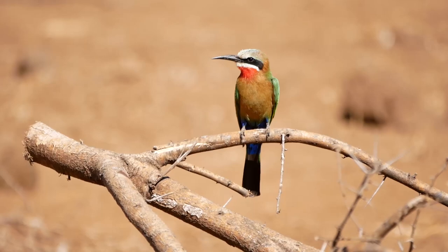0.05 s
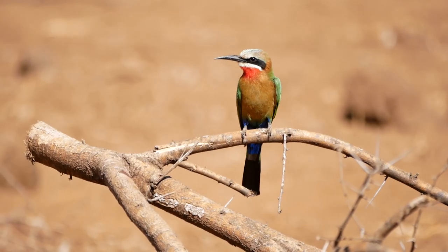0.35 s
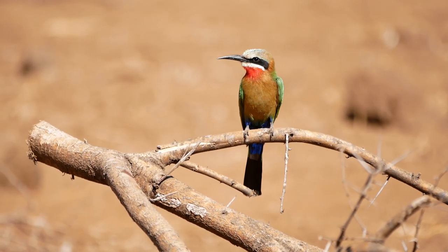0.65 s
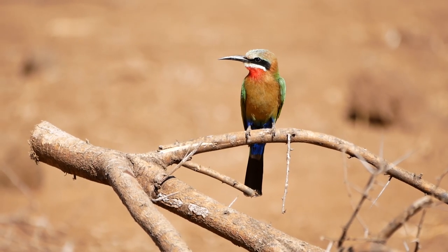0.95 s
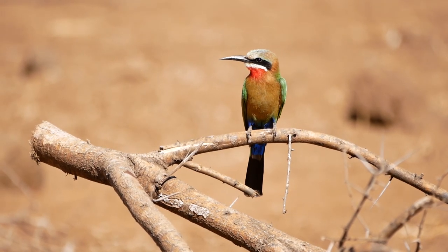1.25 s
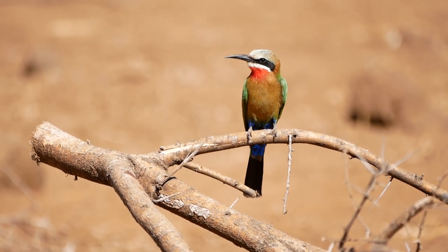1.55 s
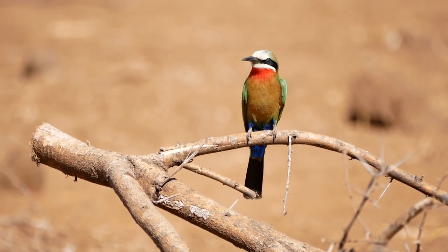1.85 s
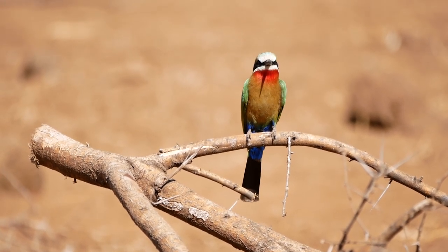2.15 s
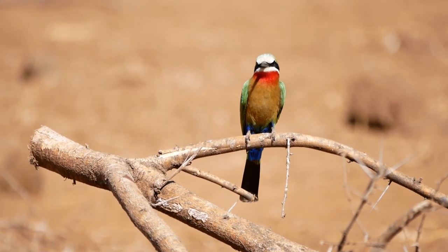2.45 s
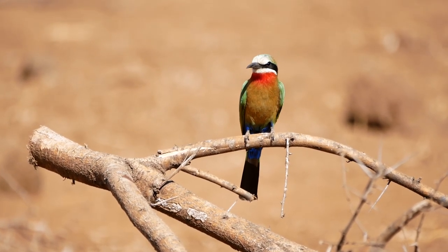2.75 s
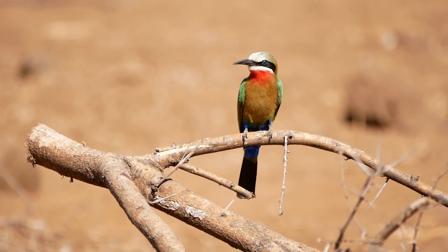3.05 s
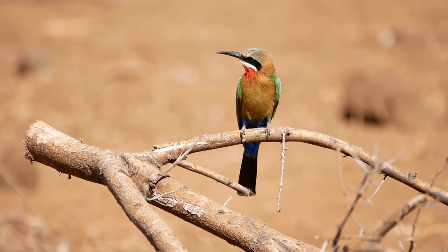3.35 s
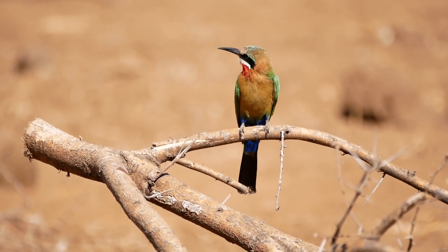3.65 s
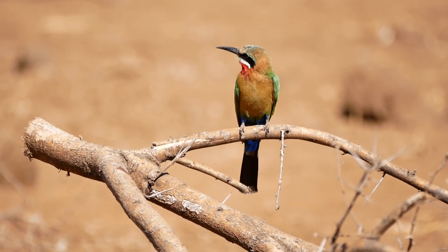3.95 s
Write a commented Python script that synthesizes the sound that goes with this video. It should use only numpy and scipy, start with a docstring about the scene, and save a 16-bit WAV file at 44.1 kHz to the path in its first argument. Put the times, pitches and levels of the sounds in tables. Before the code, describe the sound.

Small birds chirp faintly in open bush, their calls overlapping irregularly. Nearer ones give quick slurred chips while farther ones whistle and rasp with a slight echo. A steady airy hiss lies behind, and the microphone picks up almost no bass.

```python
"""Small birds in open bush

Nearer birds give quick slurred chips, farther ones whistle and rasp, and one adds thin high notes.
Every call scatters off branches on its way to the microphone and trails off in the trees.
Behind them lie a faint distant chorus and a steady airy hiss with narrow ringing bands.
The microphone passes almost no bass."""
import sys
import numpy as np
from scipy import signal
from scipy.fft import rfft, irfft, next_fast_len
from scipy.io import wavfile
from scipy.ndimage import map_coordinates

SR = 44100
rng = np.random.default_rng(int(sys.argv[2]) if len(sys.argv) > 2 else 0)


def unload_wav(signal):
    """Save mono or channel-first audio to the path in sys.argv[1] as 16-bit WAV at rate SR, clipped to [-1, 1]."""
    wavfile.write(
        sys.argv[1],
        SR,
        np.round(np.clip(np.atleast_2d(signal).T, -1, 1) * 32767).astype(np.int16),
    )


N = 176400


def amp(db):
    return 10 ** (np.asarray(db) / 20)


def unit_rms(x):
    return x / np.sqrt(np.mean(x ** 2) + 1e-20)


def gain_curve(points, hz):
    """Gain at hz, read between (Hz, dB) points on a log frequency axis."""
    point_hz, point_db = np.transpose(points)
    return amp(np.interp(np.log(hz + 1), np.log(point_hz + 1), point_db))


def filtered(x, response):
    """Shape the spectrum of x by response(hz)."""
    size = next_fast_len(N + SR // 2)
    return irfft(rfft(x, size) * response(np.fft.rfftfreq(size, 1 / SR)), size)[..., :N]


def wobble(per_s, size):
    """A smooth random curve with per_s knots a second."""
    return map_coordinates(rng.standard_normal(1024), [np.arange(size) * per_s / SR], mode="mirror")


def add(out, start_s, x):
    """Mix stereo x into out from start_s on."""
    i = int(np.clip(round(start_s * SR), 0, N - 1))
    out[:, i:i + x.shape[1]] += x[:, :N - i]


def note(length_s, pitches, crest, taper, flutter_hz, flutter_per_s, tremor_db=2.4, tremor_per_s=260):
    """One bird note: a sine slurred through the pitches, swelling unevenly to its crest and fading."""
    progress = np.linspace(0, 1, max(int(length_s * SR), 64))
    slur = np.polyfit(np.linspace(0, 1, len(pitches)), pitches, len(pitches) - 1)
    hz = np.polyval(slur, progress) + flutter_hz * wobble(flutter_per_s, len(progress))
    skewed = np.interp(progress, [0, np.clip(crest, .05, .95), 1], [0, .5, 1])
    swell = np.abs(np.sin(np.pi * skewed)) ** taper  # a small taper gives a flat top
    tremor = amp(tremor_db * wobble(tremor_per_s, len(progress)))
    tone = np.sin(2 * np.pi * np.cumsum(hz) / SR)
    return unit_rms(swell * tremor * tone) / np.sqrt(2)


def bush(call, branches_db, trees_db, branches_t60_s=0.15, trees_t60_s=0.61, side_db=-13):
    """A call at the microphone, in stereo: direct sound, quick scatter off branches, a tail from trees."""
    t = np.arange(SR // 2) / SR
    paths = np.zeros((2, len(t)))
    for db, t60_s in (branches_db, branches_t60_s), (trees_db, trees_t60_s):
        decay = np.exp(-np.log(1000) * t / t60_s)
        paths += amp(db) * rng.standard_normal(paths.shape) * decay / np.linalg.norm(decay)
    paths[0, 0] += 1  # the direct path, dead centre
    mid, side = signal.fftconvolve(call[None], paths, axes=1)
    side = amp(side_db) * side
    return np.array([mid + side, mid - side]) / np.linalg.norm(paths[0])


def air(level_db=-46.5):
    """Steady airy hiss all round the microphone, widening through the treble."""
    # Colour of the hiss. Each row: frequency in Hz, relative spectral level in dB.
    spectrum = [(120, -94), (200, -55.5), (446, -40.5), (755, -22), (957, -17), (1070, -15), (1170, -13),
                (1710, -7.5), (1840, -7), (1980, -6), (2380, -3), (4260, -1.5), (7620, -5.5), (14700, -7),
                (15500, -10.5)]
    # Its stereo width. Each row: frequency in Hz, side over mid in dB.
    spread = [(300, -11), (700, -21.5), (1500, -13.5), (3000, -9), (5000, -7.5), (8000, -5), (14000, -4.5)]
    mid, side = filtered(rng.standard_normal((2, N)), lambda hz: gain_curve(spectrum, hz))
    side = filtered(side, lambda hz: gain_curve(spread, hz))
    return amp(level_db) * np.array([mid + side, mid - side]) / np.std(mid)


def ringing():
    """Narrow bands of noise ring steadily in the middle of the hiss."""
    # Each row: centre in Hz, half-width in Hz, level in dB.
    bands = [(1851, 47, -59), (2209, 25, -64.5), (2067, 34, -68.5), (1630, 40, -72), (1455, 94, -70),
             (1088, 38, -77), (3080, 29, -68.5)]
    out = np.zeros(N)
    for centre, half_width, db in bands:
        def resonance(hz):
            peak = 1 / (1 + ((hz - centre) / half_width) ** 2)
            bass_cut = hz ** 2 / (hz ** 2 + centre ** 2)
            return peak * bass_cut
        out += amp(db) * unit_rms(filtered(rng.standard_normal(N), resonance))
    return out


def distant_chorus(count=80, level_db=-55.5, centre_hz=4046):
    """Faint chirps from far off, more echo than call."""
    out = np.zeros((2, N))
    for k in range(count):
        start_s = (k + rng.random()) / count * N / SR
        pitch, slur, offset_db, stretch = np.clip(rng.standard_normal(4), -2, 2)
        pitches = centre_hz * np.exp(.2 * pitch + 0.084 * slur * np.array([-1, 1]))
        length_s = .03 * np.exp(0.42 * stretch)
        chirp = note(length_s, pitches, crest=0.18, taper=0.33, flutter_hz=137, flutter_per_s=400)
        add(out, start_s, amp(level_db + offset_db) * bush(chirp, branches_db=-1.5, trees_db=-2.5))
    return out


def rasping_birds():
    """Glides from deep in the bush, their pitch fluttering so fast that they sound hoarse."""
    # Each row: start in seconds, length in seconds, level in dB, first and last pitch in Hz.
    rasps = [ (0.071, 0.053, -41.5, 7300, 6550), (0.282, 0.034, -45.5, 4500, 4400),
             (.19, 0.072, -51.5, 6710, 6400), (.50, .05, -46.5, 5470, 4100),
             (0.359, .035, -48.5, 3950, 3600), (0.691, 0.059, -47.5, 6660, 6300),
             (.922, .02, -46, 2680, 3300), (1.689, .02, -43, 3500, 5100), (1.695, 0.055, -45, 5390, 5200),
             (1.989, 0.049, -42.5, 4700, 7000), (2.773, .024, -41.5, 3940, 2900),
             (2.771, 0.11, -50, 2950, 2400), (2.832, 0.062, -44, 3935, 3600),
             (3.104, 0.026, -43.5, 3700, 4000), (3.305, 0.062, -44.5, 4200, 3800),
             (3.431, .08, -40, 3997, 3850), (3.506, .055, -44.5, 3875, 3600),
             (3.638, 0.035, -38, 6990, 6300), (3.66, 0.022, -37.5, 5500, 3800),
             (3.909, 0.025, -36.5, 5980, 5650)]
    out = np.zeros((2, N))
    for start_s, length_s, db, *pitches in rasps:
        rasp = note(length_s, pitches, crest=0.95, taper=0.17, flutter_hz=437.5, flutter_per_s=800)
        add(out, start_s, amp(db) * bush(rasp, branches_db=-4, trees_db=-1))
    return out


def whistling_birds():
    """Short whistles from farther off, blurred on their way through the bush."""
    # Each row: start in seconds, length in seconds, level in dB, first, middle and last pitch in Hz.
    whistles = [ (0.154, 0.056, -49.5, 3960, 3000, 2400), (.298, .043, -38, 3630, 4030, 3630),
                (0.344, 0.051, -43.5, 4010, 3760, 3300), (.550, .024, -39, 3990, 4080, 3330),
                (.594, .037, -39.5, 3080, 3100, 3150), (0.648, .05, -46, 7150, 7000, 6400),
                (.870, 0.017, -47.5, 2940, 2900, 3500), (1.19, 0.032, -44.5, 4830, 4850, 6900),
                (1.224, 0.01, -41.5, 5570, 5300, 4200), (1.251, .034, -49, 4480, 4400, 4800),
                (1.321, .024, -51, 4450, 4450, 4400), (1.38, .05, -44, 2720, 2745, 2790),
                (1.430, 0.026, -47.5, 5620, 5500, 5520), (1.467, .06, -48, 4030, 4170, 4300),
                (1.523, 0.028, -46, 2500, 2400, 2380), (1.718, .03, -42.5, 4500, 4520, 4550),
                (1.76, .07, -47, 4560, 4580, 4590), (1.84, .11, -48.5, 4620, 4740, 4660),
                (1.95, 0.018, -45, 4150, 4200, 4200), (2.155, .024, -50.5, 4420, 4300, 5800),
                (2.208, 0.02, -43.5, 4820, 4950, 5250), (2.4, .016, -41.5, 3880, 4100, 5500),
                (2.418, 0.017, -46, 4560, 5200, 4100), (2.497, .015, -46.5, 6580, 6950, 7050),
                (2.614, .13, -55, 6150, 6200, 6200), (2.668, 0.034, -42, 3750, 3830, 2400),
                (2.751, 0.024, -41.5, 4370, 4200, 3800), (2.811, 0.03, -42, 3930, 3840, 3600),
                (3.143, 0.017, -38, 4250, 4250, 4300), (3.176, .044, -39, 4450, 4510, 4380),
                (3.233, .036, -38, 4480, 4540, 4400), (3.279, 0.016, -41, 4260, 4000, 3500),
                (3.867, 0.068, -49.5, 5450, 4700, 4900), (3.975, 0.015, -50, 6100, 6200, 6250)]
    out = np.zeros((2, N))
    for start_s, length_s, db, *pitches in whistles:
        whistle = note(length_s, pitches, crest=0.4, taper=0.36, flutter_hz=61, flutter_per_s=800)
        add(out, start_s, amp(db) * bush(whistle, branches_db=-9.5, trees_db=-4.5))
    return out


def thin_bird():
    """One small bird among the trees, giving thin notes around 9 kHz."""
    # Each row: start in seconds, length in seconds, level in dB, first, middle and last pitch in Hz.
    thin_notes = [ (1.091, 0.041, -44, 9300, 9090, 9480), (2.746, 0.03, -47.5, 9150, 9200, 9300),
                  (2.967, 0.016, -46.5, 9060, 9100, 9600), (2.994, 0.015, -41, 9080, 9280, 8900),
                  (3.258, .018, -44.5, 9330, 9050, 8900), (3.289, 0.013, -46.5, 9400, 9300, 7700)]
    out = np.zeros((2, N))
    for start_s, length_s, db, *pitches in thin_notes:
        tsee = note(length_s, pitches, crest=0.45, taper=0.27, flutter_hz=70, flutter_per_s=510)
        add(out, start_s, amp(db) * bush(tsee, branches_db=-8.5, trees_db=-4.5))
    return out


def near_birds():
    """Quick slurred chips, near enough to the microphone to carry little echo."""
    # Each row: start in seconds, length in seconds, level in dB, loudest point as a share of the
    # length, then four pitches in Hz, evenly spaced from start to end.
    chips = [ (.938, 0.031, -35.5, 0.21, 4260, 5030, 5000, 5500),
             (1.139, .036, -34.5, .35, 3900, 4680, 4900, 4930),
             (1.827, 0.025, -42, 0.69, 2750, 2900, 3140, 3300),
             (2.046, 0.02, -43, 0.46, 3860, 4700, 4800, 4900),
             (2.072, .04, -36, .58, 2800, 3750, 4480, 4950),
             (2.259, 0.028, -39, 0.6, 4170, 4300, 4640, 4200),
             (2.316, 0.044, -37.5, 0.67, 5880, 5300, 5180, 4200),
             (2.366, .03, -39, 0.77, 5170, 4800, 4250, 4100),
             (2.457, .033, -40.5, .55, 3430, 4250, 5100, 4600),
             (3.357, .028, -38, 0.35, 6260, 4750, 4000, 3600),
             (3.386, 0.033, -43, 0.37, 3390, 3200, 3600, 4600),
             (3.463, 0.028, -38.5, .55, 5680, 4600, 4050, 3600),
             (3.704, 0.041, -30.5, 0.68, 4340, 5220, 5030, 7100),
             (3.972, .027, -41.5, .5, 3150, 3080, 3130, 3450), ]
    out = np.zeros((2, N))
    for start_s, length_s, db, crest, *pitches in chips:
        chip = note(length_s, pitches, crest, taper=0.68, flutter_hz=96, flutter_per_s=810)
        add(out, start_s, amp(db) * bush(chip, branches_db=-7.5, trees_db=-13.5))
    return out


def scene(throat_cut_hz=1200):
    """All the birds, whose small throats give no bass, over the hiss and its ringing."""
    birds = near_birds() + whistling_birds() + rasping_birds() + thin_bird() + distant_chorus()
    birds = filtered(birds, lambda hz: hz ** 2 / np.hypot(throat_cut_hz ** 2, hz ** 2))
    return birds + air() + ringing()


def record(dry, silence_s=.069, fade_s=.003, low_cut_hz=170, top_hz=15800):
    """The microphone opens after a moment of silence, rolls off the bass and stops at top_hz."""
    fade_in = np.clip((np.arange(N) / SR - silence_s) / fade_s, 0, 1)
    return filtered(dry * fade_in, lambda hz: (hz < top_hz) * (hz / np.hypot(hz, low_cut_hz)) ** 2)


dry = scene()
out = record(dry)
unload_wav(out)
```